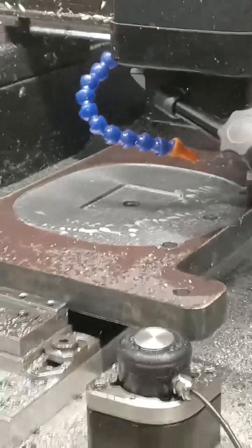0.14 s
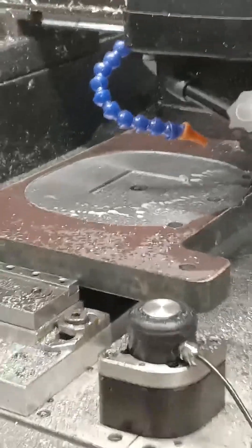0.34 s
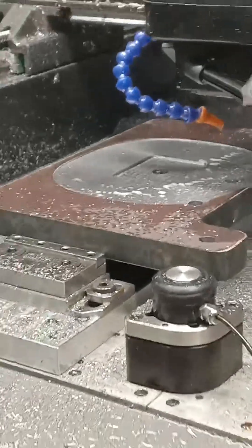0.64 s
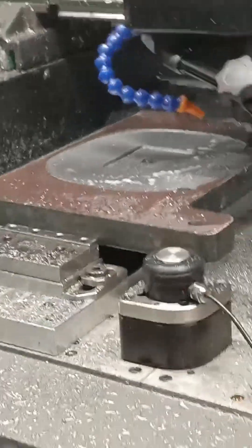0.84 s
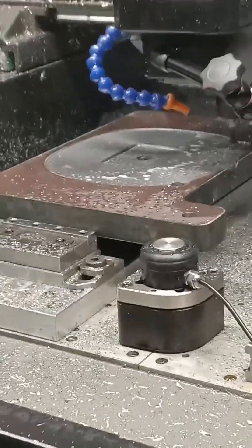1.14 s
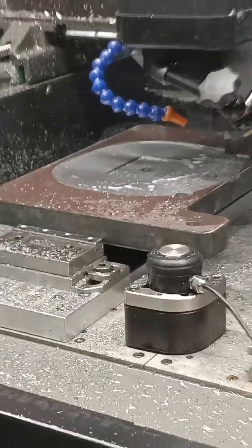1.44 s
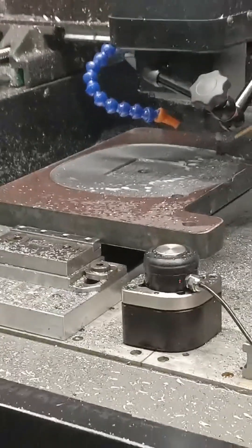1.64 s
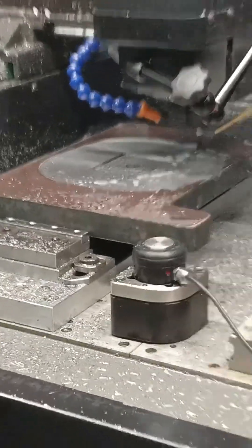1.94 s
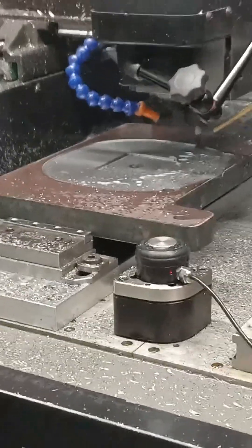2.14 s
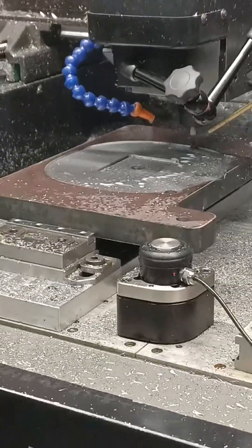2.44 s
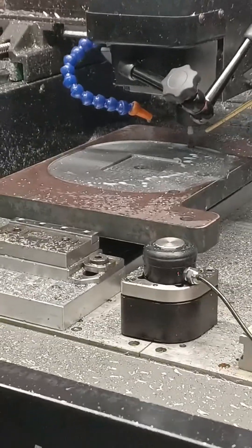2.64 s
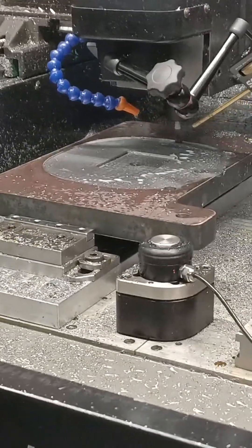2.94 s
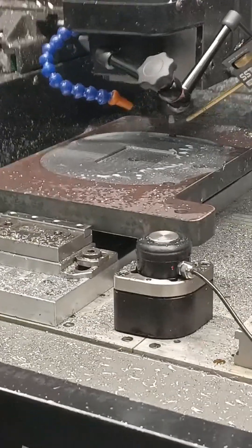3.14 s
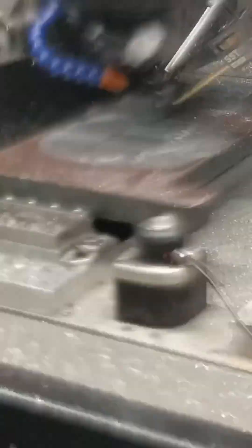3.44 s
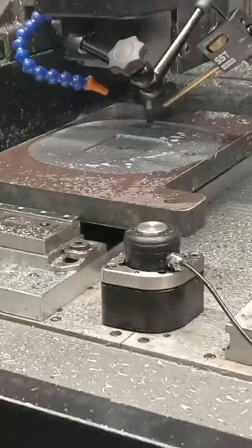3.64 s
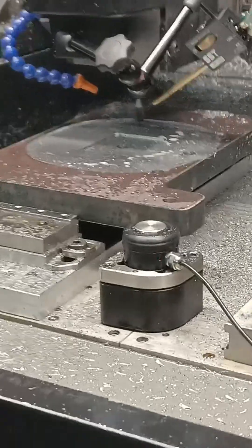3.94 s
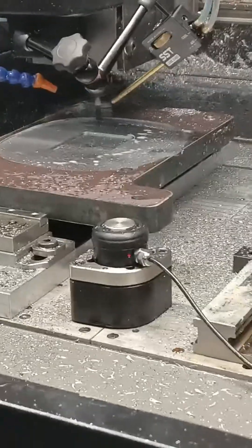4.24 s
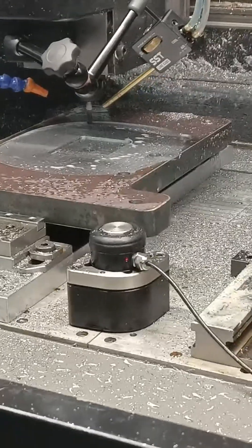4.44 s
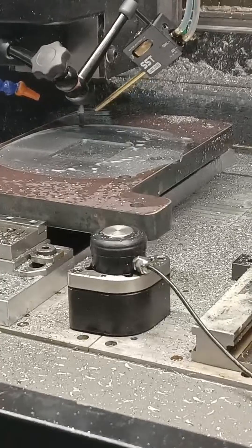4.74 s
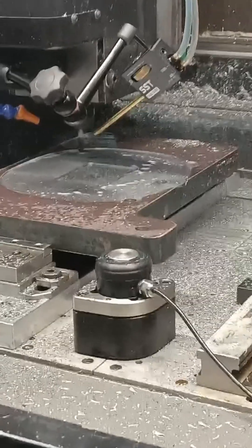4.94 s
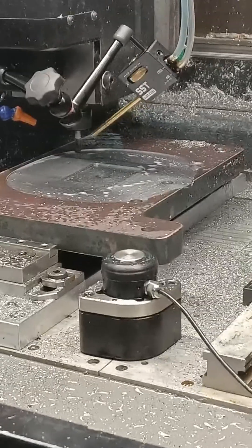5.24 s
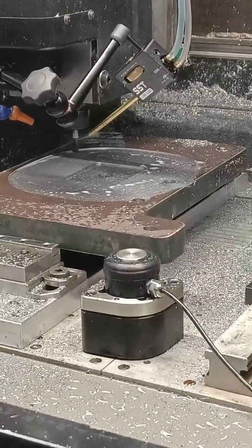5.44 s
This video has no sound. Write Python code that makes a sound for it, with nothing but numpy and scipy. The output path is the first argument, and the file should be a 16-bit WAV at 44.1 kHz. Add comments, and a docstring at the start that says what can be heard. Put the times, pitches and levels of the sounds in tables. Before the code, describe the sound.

A milling machine is already cutting steel plate, heard in mono from a nearby hand-held microphone. A strong whine near 500 Hz dominates, quickly gaining strength at the start, with weaker overtones and lower spindle hum swelling and fading separately. Around 0.6-0.7 s its pitch sags by a tiny amount, then recovers by 1 s; it swells at about 0.9 s. The plate's rough roar and the bright rasp of chips flutter throughout, thickening near 1.1 s, easing before 2 s, then fullest from about 2.5 s. A high mist hiss dips near 0.9 s and is stronger after 2.4 s. Beneath lie low workshop rumble with short surges, especially around 4.1 and 4.6 s, and a pump's drone and rattle, about eighteen strokes a second, gradually emerging. Small rising squeals pass at 0.3 and 1.5-1.9 s; a louder falling one comes at 5.1-5.4 s. The machining continues to the end, around 5.6 s.

```python
"""Milling steel plate, heard from a hand-held microphone

A six-tooth cutter at about 5000 rpm whines at its tooth rate and sags briefly as it bites: sines on one turn count.
Chips rasp over the roar of the plate and a mist nozzle hisses: shaped noise that flutters, in patches of random gain.
A pump throbs in the workshop rumble: harmonics of its stroke rate and one rattle repeated at every stroke.
The microphone drifts through the standing waves of the enclosure, so each line swells and fades on its own."""
import sys
import numpy as np
from scipy import signal
from scipy.fft import rfft, irfft, next_fast_len
from scipy.io import wavfile
from scipy.ndimage import uniform_filter1d, map_coordinates

SR = 44100
rng = np.random.default_rng(int(sys.argv[2]) if len(sys.argv) > 2 else 0)


def log_audio(samples):
    """Write samples as a 16-bit WAV file to the path given in sys.argv[1]."""
    # one column per channel
    frames = np.atleast_2d(samples).T
    # limit to full scale, then quantise
    limited = np.clip(frames, -1, 1)
    pcm = np.round(limited * 32767).astype(np.int16)
    wavfile.write(sys.argv[1], SR, pcm)


N = 246695  # samples


def amp(db):
    """Decibels to gain."""
    return 10 ** (np.asarray(db) / 20)


def unit(x):
    """Scale to rms 1."""
    return x / np.sqrt(np.mean(x ** 2) + 1e-20)


def clock():
    """Time of each sample in seconds."""
    return np.arange(N) / SR


def along(points, hz):
    """Points of (Hz, value) read on a log frequency axis."""
    f, v = np.transpose(points)
    return np.interp(np.log(hz + 1), np.log(f + 1), v)


def curve(rows):
    """Points of (seconds, value) joined into one value per sample."""
    seconds, values = np.transpose(rows)
    return np.interp(clock(), seconds, values)


def wobble(rate):
    """A smooth random curve with rate knots a second."""
    knots = rng.standard_normal(int(N * rate / SR) + 4)
    return map_coordinates(knots, [clock() * rate])


def bump(centre, half_width):
    """A bell of height 1 in time; both settings in seconds."""
    return np.exp(-((clock() - centre) / half_width) ** 2)


def swell(start, end, edge):
    """A gate from 0 to 1 that opens and closes over edge seconds."""
    t = clock()
    ramp = np.clip(np.minimum(t - start, end - t) / edge, 0, 1)
    return np.sin(np.pi / 2 * ramp)


def filtered(x, response):
    """x through a response given as a function of frequency."""
    m = next_fast_len(N + 8192)  # zero padding keeps the end from wrapping onto the start
    spectrum = rfft(x, m) * response(np.fft.rfftfreq(m, 1 / SR))
    return irfft(spectrum, m)[..., :N]


def coloured(x, spectrum):
    """x shaped by a table of (Hz, dB), at rms 1."""
    return unit(filtered(x, lambda hz: amp(along(spectrum, hz))))


def rush(spectrum, patchy_db):
    """Turbulent noise of rms 1 whose gain varies in random patches of time and frequency."""
    cells = signal.stft(rng.standard_normal(N), nperseg=512)[2]
    patches = uniform_filter1d(rng.standard_normal(cells.shape), size=5, axis=0)  # 5 frequency bins
    patches = uniform_filter1d(patches, size=14, axis=1)  # 14 time frames
    noise = signal.istft(cells * amp(patchy_db * unit(patches)), nperseg=512)[1][:N]
    return coloured(noise, spectrum)


def tone(cycles):
    """A sine of rms 1 that follows a count of cycles, from a random phase."""
    return np.sqrt(2) * np.sin(2 * np.pi * (cycles + rng.random()))


def lines(turns, table, wander_db, rate):
    """Harmonics of a rotation, each wandering in level among the standing waves."""
    return sum(amp(db + wander_db * wobble(rate)) * tone(k * turns) for k, db in table)


def under_load(load_db, full_cut_db, growth):
    """Level in dB of a layer that gains growth dB for each dB of cutting load."""
    return full_cut_db + growth * load_db


# Rumble of the workshop floor. Each row: frequency in Hz, relative level in dB per Hz.
RUMBLE_SPECTRUM = [(20, -40), (60, -21), (100, -9), (135, -2.5), (210, 2.5), (275, 1), (335, -5),
                   (480, -2.5), (650, -4.5), (770, -9.5), (840, -2.5), (1000, -12), (1500, -22),
                   (3000, -35)]
# Moments when the rumble surges. Each row: centre in seconds, rise in dB.
RUMBLE_SURGES = [(.6, 0.5), (1.33, 2.5), (2.1, 3), (3.57, 3), (4.1, 4), (4.6, 4)]


def workshop(load_db):
    """Machine and workshop rumble, low noise a little stronger under load, with a few short surges."""
    surge_db = sum(db * bump(s, half_width=0.16) for s, db in RUMBLE_SURGES)
    level_db = under_load(load_db, full_cut_db=-30.5, growth=0.34) + surge_db + 0.56 * wobble(11)
    return amp(level_db) * rush(RUMBLE_SPECTRUM, patchy_db=1.2)


# The pump comes through more as the microphone backs out of the enclosure.
# Each row: time in seconds, gain in dB on drone and rattle.
PUMP_GAIN = [(0, -5), (1.1, -1.5), (2.6, .5), (5.59, 1.5)]
# Strong tones of the pump. Each row: multiple of the stroke rate, level in dB before the drone's gain.
PUMP_TONES = [(8, -43), (10, -42.5), (11, -39.5), (12, -41), (16, -39.5), (18, -44), (20, -45), (24, -41),
              (26, -39), (27, -48), (28, -45), (29, -40), (31, -43.5), (32, -38), (33, -40), (37, -40.5),
              (38, -43.5), (39, -43), (47, -43.5), (49, -42), (53, -44.5), (55, -39), (57, -46.5)]
# Colour of the rattle at each stroke. Each row: frequency in Hz, relative level in dB.
RATTLE_SPECTRUM = [(100, -28), (200, -5), (600, -4), (900, -0.5), (1100, 3.5), (1400, -7), (1600, -3),
                   (1800, 0.5), (2200, -11.5), (3500, -20), (6000, -45)]
PUMP_HZ, HUM_HZ = 18.54, 120  # strokes a second, and the hum of the motor


def pump():
    """Every stroke repeats the same rattle over the pump's drone and its motor's mains hum."""
    strokes = PUMP_HZ * clock() + 0.002 * wobble(2.006)  # the stroke count is slightly unsteady
    one_stroke = rng.standard_normal(round(SR / PUMP_HZ))
    position = (strokes % 1 * len(one_stroke)).astype(int)
    rattle = coloured(one_stroke[position], RATTLE_SPECTRUM)
    drone = lines(strokes, PUMP_TONES, wander_db=1.5, rate=1.31)
    hum = amp(-44.0) * tone(HUM_HZ * clock())
    return amp(curve(PUMP_GAIN)) * (amp(-1.2) * drone + amp(-34.5) * rattle) + hum


# Hiss of the mist nozzle. Each row: time in seconds, level in dB before a fixed trim.
HISS_LEVEL = [(0.0, -35), (0.73, -37.5), (0.87, -38), (1.03, -35), (2.24, -34.5), (2.46, -32.5),
              (5.59, -32)]
# Colour of the air jet. Each row: frequency in Hz, relative level in dB per Hz.
HISS_SPECTRUM = [(3000, -47), (7000, -11), (9000, -9.5), (10100, -4), (11100, -5), (12200, 1),
                 (15500, -1.5)]


def mist():
    """The air jet hisses: bright turbulent noise with a slight flutter."""
    trim_db = 0.96
    flutter_db = 0.33 * wobble(45) + 0.33 * wobble(14)
    return amp(curve(HISS_LEVEL) + trim_db + flutter_db) * rush(HISS_SPECTRUM, patchy_db=1.0)


# Spindle tones that sing out for a while.
# Each row: start in seconds, end in seconds, multiple of the turning rate, level in dB.
SINGING_TONES = [(0, .46, 24, -38.5), (.55, 1.2, 54, -49), (0.881, 1.753, 30, -46.5), (2.05, 2.8, 66, -46),
                 (3.15, 4.45, 24, -46), (4.2, 5.7, 18, -48.5), (4.1, 5.7, 29, -48)]


def singing(turns):
    """High spindle tones flicker up; uneven chips shake the cutter's angle, roughening the higher ones more."""
    out = 0
    for start, end, multiple, db in SINGING_TONES:
        shaken = turns + 0.004 * wobble(150)  # shake in turns
        level = amp(db + 3 * wobble(30)) * swell(start, end, edge=0.083)
        out = out + level * tone(multiple * shaken)
    return out


# Short gliding squeals.
# Each row: start in seconds, end in seconds, first pitch in Hz, last pitch in Hz, level in dB.
GLIDING_SQUEALS = [(0.27, .42, 806, 844, -38), (1.483, 1.92, 1336, 1403, -42.5),
                   (5.131, 5.36, 855, 805, -29.5)]


def squeals():
    """Short squeals glide by, each a sine of slightly unsteady pitch."""
    out = 0
    for start, end, start_hz, end_hz, db in GLIDING_SQUEALS:
        glide_hz = np.interp(clock(), [start, end], [start_hz, end_hz])
        pitch_hz = glide_hz * (1 + 0.0039 * wobble(40))
        out = out + amp(db) * swell(start, end, edge=0.085) * tone(np.cumsum(pitch_hz) / SR)
    return out


TEETH = 6  # on the cutter
# Roar of the plate under the cut. Each row: frequency in Hz, relative level in dB per Hz.
ROAR_SPECTRUM = [(300, -23), (600, -2), (850, 4), (1100, 4.5), (1250, 0), (1420, 3.5), (1580, -1.5),
                 (1800, 2), (2100, 1), (2450, -4.5), (2800, -10.5), (5000, -34)]
# Rasp of the chips. Each row: frequency in Hz, relative level in dB per Hz.
RASP_SPECTRUM = [(1200, -13), (2500, 2.5), (3000, 2), (3600, 1), (4600, 2.5), (5400, 1.5), (6100, -1),
                 (8000, -7.5), (12000, -22)]


def chips(turns, load_db):
    """The plate roars, a little louder at every tooth; chips add a bright rasp; both flutter together."""
    bite = 1 + 0.23 * np.cos(2 * np.pi * TEETH * turns)
    uneven_db = 0.73 * wobble(70)
    roar_db = under_load(load_db, full_cut_db=-32, growth=1.0) + 0.75 * wobble(18)
    roar = amp(roar_db) * bite * rush(ROAR_SPECTRUM, patchy_db=1.3)
    rasp_db = under_load(load_db, full_cut_db=-34.5, growth=0.82) + 0.53 * wobble(40)
    rasp = amp(rasp_db) * rush(RASP_SPECTRUM, patchy_db=1.6)
    return amp(uneven_db) * (roar + rasp)


# Standing waves of the enclosure as the microphone crosses them.
# Each row: centre in seconds, half width in seconds, multiple of the turning rate, change in dB.
STANDING_WAVES = [(.1, 0.28, 1, 3.5), (1.13, 0.69, 1, -7), (.1, 0.25, 5, -9), (5.66, 1.0, 5, -15),
                  (0.11, 0.18, 12, -19), (1.3, 0.62, 12, 5), (2.48, 0.44, 12, 7.5)]


def standing_db(order):
    """What the standing waves add, in dB, to one multiple of the turning rate."""
    return sum(db * bump(s, half_width) for s, half_width, k, db in STANDING_WAVES if round(k) == order)


# Whine at the tooth rate. Each row: time in seconds, level in dB before a fixed trim.
WHINE_LEVEL = [(0.0, -25.5), (0.08, -22), (0.26, -20), (0.72, -20.5), (0.87, -17), (1.01, -22.5),
               (1.87, -23), (2.9, -21), (5.2, -21), (5.59, -23.5)]
# Weaker spindle tones. Each row: multiple of the turning rate, level in dB before the load's gain.
WEAK_ORDERS = [(2, -51.5), (3, -43), (4, -47), (7, -49), (8, -48), (11, -47.5), (17, -54.5), (18, -48),
               (21, -47.5), (22, -54), (24, -48), (25, -58), (27, -60), (29, -51), (30, -49.5), (31, -64),
               (34, -57.5), (35, -56), (36, -58), (41, -54.5), (42, -59), (54, -53.5), (66, -63)]


def cutter(turns, load_db):
    """Tooth strikes give the whine, runout a tone one order below; octave and weak orders grow with load."""
    def heard(db, order):
        """One spindle tone as the standing waves let it through."""
        return amp(db + standing_db(order)) * tone(order * turns)

    trim_db = 0.87
    whine = heard(curve(WHINE_LEVEL) + trim_db + 0.26 * wobble(12), order=TEETH)
    octave_db = under_load(load_db, full_cut_db=-36.5, growth=0.89) + 1.54 * wobble(16)
    octave = heard(octave_db, order=2 * TEETH)
    runout = heard(under_load(load_db, full_cut_db=-36, growth=1), order=TEETH - 1)
    unbalance = heard(-41.5, order=1)
    orders_gain = amp(under_load(load_db, full_cut_db=0.66, growth=0.38))
    orders = orders_gain * lines(turns, WEAK_ORDERS, wander_db=0.5, rate=2.15)
    return whine + octave + runout + unbalance + orders


# Spindle speed, racing slightly and then sagging as the cutter bites.
# Each row: time in seconds, speed in turns a second.
SPINDLE_SPEED = [(0, 83.6), (0.2, 84.4), (0.55, 84.42), (0.73, 83.22), (1.03, 83.9), (5.59, 84.1)]
# Cutting load as the cutter enters the plate. Each row: time in seconds, load in dB relative to the full cut.
CUTTING_LOAD = [(0, -3), (0.8, -4), (1.15, -1.5), (1.9, -3), (2.5, 0), (3.1, 0), (5.59, -1.1)]


def scene():
    """Spindle speed and load drive the cut and rumble; pump, mist and squeals run beside them, at one point."""
    turns = np.cumsum(curve(SPINDLE_SPEED)) / SR
    load_db = curve(CUTTING_LOAD)
    background = workshop(load_db) + pump() + mist()
    milling = singing(turns) + squeals() + chips(turns, load_db) + cutter(turns, load_db)
    mono = background + milling
    return np.array([mono, mono])


# Response of the microphone port, with a deep notch. Each row: frequency in Hz, gain in dB.
PORT_RESPONSE = [(6200, -0.5), (7000, -4.5), (7900, -11), (8100, -2.5), (9500, 2)]
TOP_HZ = 15720  # band limit


def record(dry):
    """The microphone port colours the sound; nothing passes above the band limit."""
    return filtered(dry, lambda hz: amp(along(PORT_RESPONSE, hz)) * (hz < TOP_HZ))


dry = scene()
out = record(dry)
log_audio(out)
```